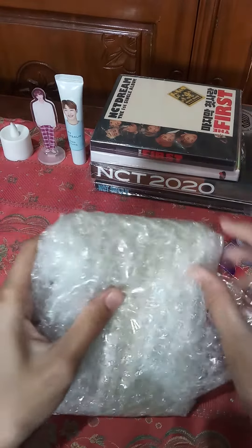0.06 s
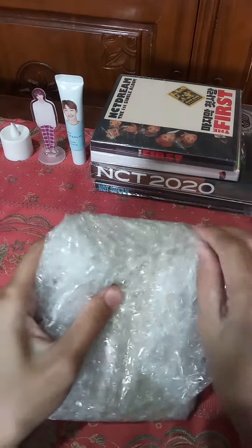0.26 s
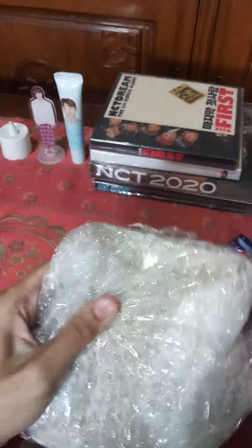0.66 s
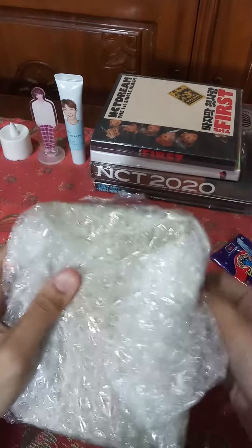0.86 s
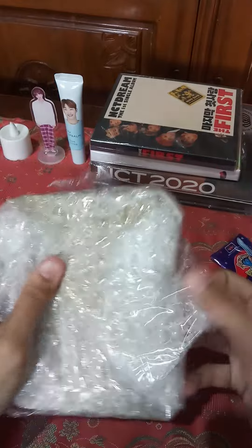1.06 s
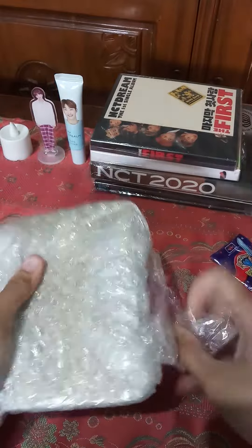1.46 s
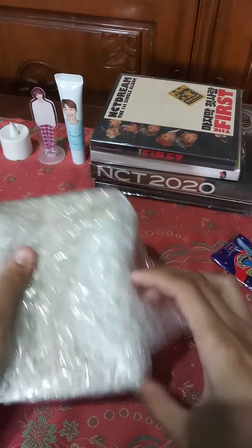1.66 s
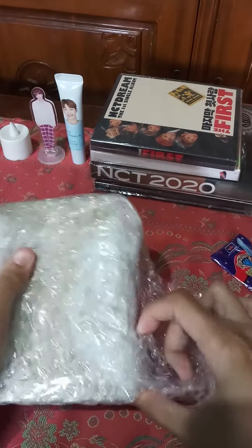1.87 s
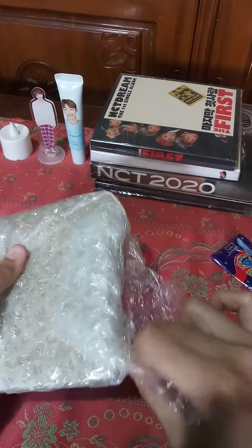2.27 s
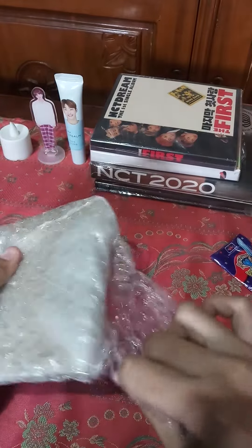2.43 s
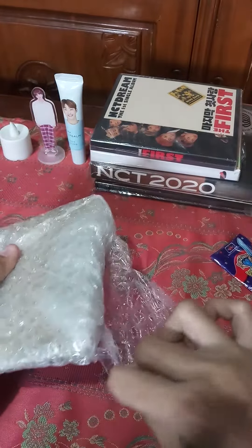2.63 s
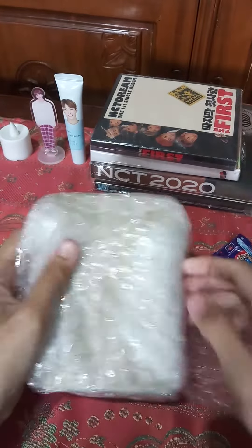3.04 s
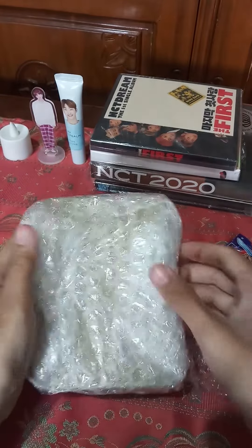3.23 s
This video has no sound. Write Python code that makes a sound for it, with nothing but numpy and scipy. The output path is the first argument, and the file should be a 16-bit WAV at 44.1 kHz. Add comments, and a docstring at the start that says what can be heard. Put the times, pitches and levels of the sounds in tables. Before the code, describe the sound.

Bubble wrap crinkles in uneven clumps as hands turn a parcel. It scrunches and bumps the table early, then snaps and crackles as fingers pull a loose flap, close to the microphone in a small quiet room.

```python
"""Bubble wrap crinkles close by in a small quiet room, as hands turn a parcel on a table and pick
at its loose flap. The film buckles in clumps of tiny clicks, single creases snap, air cells give
dull pops and a firm grip scrunches many at once. The parcel bumps the table and slides on its cloth;
the flap peels free in quick slips and rings while taut.
A low hum swells and fades behind the room's hiss."""
import sys
import numpy as np
from scipy import signal
from scipy.fft import rfft, irfft
from scipy.io import wavfile
from scipy.ndimage import uniform_filter1d

SR = 44100
rng = np.random.default_rng(int(sys.argv[2]) if len(sys.argv) > 2 else 0)


def master(y):
    """Save y as 16-bit WAV."""
    cut = np.clip(np.atleast_2d(y).T, -1, 1)
    pcm = np.round(cut * 32767)  # scale
    wavfile.write(sys.argv[1], SR, pcm.astype(np.int16))


N = 145530
T = np.arange(N) / SR
SIDES = np.array([[1], [-1]])  # left, right
PEEL_START_S, PEEL_END_S, PICK_END_S = 2.2185, 2.298, 2.9

# Working of the film: t/s, bright crinkle level/dB, dull rubbing level/dB
HANDLING = [(0.01, -43, -50), (0.07, -46.5, -49), (0.16, -50.5, -67), (0.24, -39, -47.5), (0.3, -43, -57),
            (0.42, -40.5, -62), (0.55, -38, -61), (0.62, -37.5, -55), (0.67, -43, -40), (0.75, -46, -55.5),
            (0.82, -40.5, -41), (0.95, -51, -59), (1.0, -40.5, -41), (1.05, -50.5, -58), (1.09, -37.5, -49),
            (1.18, -37.5, -41), (1.2, -41, -48.5), (1.34, -41.5, -55), (1.47, -46.5, -78),
            (1.5, -36.5, -47), (1.63, -44.5, -53), (1.73, -43, -60), (1.86, -36.5, -42.5),
            (1.92, -45.5, -48.5), (2.06, -41.5, -56), (2.23, -43.5, -55.5), (2.34, -45, -75),
            (2.4, -43, -55), (2.46, -32, -40.5), (2.51, -51.5, -55), (2.56, -40, -50), (2.61, -47, -53.5),
            (2.79, -52, -64), (2.81, -42.5, -70), (2.96, -44, -49), (3.02, -53.5, -72),
            (3.05, -40.5, -47.5), (3.1, -47.5, -57), (3.17, -47.5, -61), (3.27, -53, -58.5)]
# Film spectrum: f/Hz, level/dB
FILM_SPECTRUM = [(150, -34.5), (500, -15), (1000, -8.5), (1600, -7.5), (2300, -3), (5200, 0.9), (6700, 1),
                 (8000, -5), (10500, -7.5), (13000, -14.5), (16000, -25)]
# Rubbed air cell spectrum: f/Hz, level/dB
CELL_SPECTRUM = [(40, -47), (150, -15), (280, -3.5), (460, 3), (900, 3.5), (1300, 3.5), (1800, -15),
                 (4000, -6)]
# Tick spectrum: f/Hz, level/dB
TICK_SPECTRUM = [(300, -30), (2200, -1), (6500, 1), (9000, -3), (13000, -2), (16000, -5)]
def crinkle():
    """Clumps of bright buckles over dull rubbing of air cells; ticks stand out as fingers pick the flap."""
    bright_db, dull_db = in_time(HANDLING)
    clump_db = 2 * wander(size=400)
    picking = (T > PEEL_START_S) & (T < PICK_END_S)
    tick_db = np.minimum(bright_db, -40) - 13.5 + 6 * picking  # capped under a hard grip
    bright = buckles(per_s=3300, spread_db=2.5, level=from_db(bright_db - 2 + clump_db), facets=32)
    dull = buckles(per_s=900, spread_db=3.5, level=from_db(dull_db - 3.5 + clump_db))
    ticks = buckles(per_s=110, spread_db=2.5, level=from_db(tick_db), facets=8)
    rubbing = cushion(through(dull, colour(CELL_SPECTRUM)))
    return through(bright, colour(FILM_SPECTRUM)) + rubbing + through(ticks, colour(TICK_SPECTRUM))


FACET_RANGE_HZ, FACET_WIDTH_HZ, FACET_PAN_DB, FACET_LAG_S = (1121, 7500), 190, 2.5, 0.00005
def buckles(per_s, spread_db, level, facets=14):
    """Random uneven clicks from film facets that take turns, each with its own place, pitch and ring."""
    sizes = from_db(spread_db * np.minimum(rng.exponential(1, N), 4)) * rng.choice([-1, 1], N)
    clicks = unit(sizes * (rng.random(N) < per_s / SR)) * np.sqrt(N) * level
    owner = rng.integers(0, facets, N)
    turns = from_db([3 * wander(size=3000) for _ in range(facets)])
    turns /= np.sqrt(np.mean(turns ** 2, axis=0))
    places = rng.permutation(np.linspace(-1, 1, facets))
    out = np.zeros((2, N))
    for k, (place, hz) in enumerate(zip(places, np.geomspace(*FACET_RANGE_HZ, facets))):
        facet = from_db(-0.5) * dying_noise(t60_s=0.0066)
        facet += np.sinc(np.arange(facet.shape[1]) - 10 + place * FACET_LAG_S * SR * SIDES)  # direct click
        facet += from_db(6) * resonate(facet, hz, FACET_WIDTH_HZ)
        out += through(clicks * turns[k] * (owner == k), unit(facet) * panned(place * FACET_PAN_DB))
    return out


def cushion(x, cutoff_hz=4000):
    """Air in the cells absorbs the treble."""
    return butterworth(x, 4, cutoff_hz, "low")


# Firm grips: t/s, length/s, crackle level/dB, body level/dB
GRIPS = [(0.634, 0.0089, -24, -38), (0.651, 0.0044, -36, -54), (0.655, 0.035, -47, -60),
         (1.074, 0.0083, -37.5, -73), (1.479, 0.016, -41.5, -56), (1.508, 0.01, -29, -38.5),
         (1.759, 0.009, -25.5, -31.5), (1.77, 0.011, -34, -45), (1.78, 0.0062, -27.5, -31),
         (1.786, 0.011, -33.5, -36), (2.42, 0.0097, -39, -52), (2.444, 0.023, -39, -41)]
# Spectrum of the cells under a grip: f/Hz, level/dB
BODY_SPECTRUM = [(90, -20), (200, -17), (330, -11.5), (600, -4.5), (1050, 1.5), (1600, -6.5), (3000, -14.5)]
def scrunches():
    """Brief avalanches of buckles, each with a dull body from the cells beneath."""
    crackle, body = np.zeros(N), np.zeros(N)
    for s, length_s, crackle_db, body_db in GRIPS:
        grip = np.exp(-((T - s) * 2 / length_s - 1) ** 4)
        crackle += from_db(crackle_db) * grip
        body += from_db(body_db) * grip
    bright, dull = [buckles(per_s=4400, spread_db=1, level=level) for level in (crackle, body)]
    return through(bright, colour(FILM_SPECTRUM)) + cushion(through(dull, colour(BODY_SPECTRUM)))


# Crease snaps: t/s, relative level/dB, f/Hz, left minus right/dB
SNAPS = [(0.1828, -23, 4300, -14), (0.373, -9, 2220, -1), (0.4844, -12.5, 6500, -1), (0.5383, -7, 6450, 6),
         (0.568, -13.5, 4600, 0), (0.6388, -0.5, 2380, -4.5), (0.6496, -3.5, 5940, -3),
         (1.0111, -11.5, 3340, -6), (1.0547, -19.5, 4000, -5), (1.165, -8, 5040, -1),
         (1.1715, -11, 5030, 1), (1.396, -15.5, 8500, -13), (1.4087, -10, 6460, 8),
         (1.4834, -12.5, 4130, -3), (1.5149, -9, 4030, 8), (1.9446, -11, 4800, 0), (2.0022, -19.5, 3530, 1),
         (2.0642, -8.5, 2000, 1), (2.146, -16, 5150, -11), (2.163, -7, 7050, -4), (2.244, -12, 11600, -20),
         (2.313, -11.5, 3660, -13), (2.3592, -5, 3670, -6.5), (2.3637, -13, 3900, -5),
         (2.3743, -6.5, 3550, 7), (2.3853, -10, 4180, -9), (2.392, -12.5, 5050, -12),
         (2.4167, -7.5, 4800, -0.5), (2.691, -22.5, 7500, -8), (2.768, -19, 5000, -7),
         (2.804, -17.5, 3300, 7), (2.838, -15.5, 6000, 6), (3.0412, -9.5, 2260, -1.5)]
# Crease spectrum: f/Hz, level/dB
SNAP_SPECTRUM = [(100, -31.5), (400, -18.5), (1000, 1.5), (1600, -4), (2500, 3), (6700, 10.5), (8200, 8.5),
                 (12000, 5), (16000, 9)]
def snaps():
    """Single creases snap through, in quick runs while the flap is pulled."""
    out, tone = np.zeros((2, N)), colour(SNAP_SPECTRUM, tilted=False)
    for s, db, hz, pan_db in SNAPS:
        snap = unit(through(flip(hz), tone))
        add(out, s, from_db(db + 0.5) * snap * panned(pan_db))
    return out


FLIP_SAMPLES, FLIP_LAG_S, STEP_GAP_RANGE_S = 2048, 0.00002, (0.0001505, 0.0007385)
def flip(hz, t60_cycles=2.5, shiver_db=-6.5):
    """A patch of film jumps shape in two steps, each a damped swing; the sheet around it shivers."""
    t = T[:FLIP_SAMPLES] - FLIP_LAG_S * (1 + rng.normal() * SIDES)
    ages = np.maximum([t, t - rng.uniform(*STEP_GAP_RANGE_S)], 0)
    first, second = np.sin(2 * np.pi * hz * ages) * from_db(-60 * ages * hz / t60_cycles)
    swing = unit(first + second / 3) * rng.choice([-1, 1])
    shiver = unit(through(swing, dying_noise(t60_s=0.015))[:, :FLIP_SAMPLES])
    return unit(swing + from_db(shiver_db) * shiver)


SLIPS_PER_S, SLIP_START_HZ, SLIP_FALL_OCT_PER_S, SLIP_RISE_DB_PER_S = 94, 6500, 14, 62
def peel():
    """Clinging film lets go in near-regular slips, louder and lower as the flap comes free."""
    out, tone = np.zeros((2, N)), colour(SNAP_SPECTRUM)
    for age_s in np.arange(0, PEEL_END_S - PEEL_START_S, 1 / SLIPS_PER_S):
        jitter, uneven_db = rng.standard_normal(2)
        slip = through(flip(SLIP_START_HZ * 2 ** (-SLIP_FALL_OCT_PER_S * age_s)), tone)
        gain = from_db(-17.5 + SLIP_RISE_DB_PER_S * age_s + uneven_db)
        add(out, PEEL_START_S + age_s + 0.05 * jitter / SLIPS_PER_S, gain * slip / np.linalg.norm(slip))
    return out


# Flap resonances: f/Hz, bandwidth/Hz, level/dB
FLAP_MODES = [(2410, 83, -22), (3430, 126, -0.5)]
# Pull on the flap: t/s, tautness/0-1
FLAP_PULL = [(1.5, 0.4), (1.72, .6), (2.36, 0.75), (2.48, 0)]
def flap_ring(film):
    """The taut flap adds its own resonances to the crackle."""
    taut, = in_time(FLAP_PULL)
    return sum(from_db(db) * resonate(film * taut, hz, width_hz) for hz, width_hz, db in FLAP_MODES)


# Air cell dents: t/s, relative level/dB, f/Hz
POPS = [(.252, -28, 1460), (.331, -27.5, 1260), (.996, -23, 890), (1.162, -23.5, 1350), (2.002, -31, 960),
        (2.205, -28.5, 1120), (2.343, -24, 1020), (2.459, -27.5, 877), (2.575, -29, 1020)]
def pops():
    """Air cells dent under a finger with a dull pop."""
    out = np.zeros((2, N))
    for s, db, hz in POPS:
        add(out, s, from_db(db + 6.5) * flip(hz, t60_cycles=3.5, shiver_db=-1))
    return butterworth(out, order=2, hz=350, kind="high")


# Parcel hits on the table: t/s, level/dB
BUMPS = [(0.6386, -2.5), (1.011, -19.5), (1.764, -17), (1.784, -34)]
# Parcel spectrum: f/Hz, level/dB
PARCEL_SPECTRUM = [(50, -5), (160, 2.5), (280, -4), (450, 4.5), (880, 3.5), (1150, -4), (1700, -8),
                   (5000, -37)]
def bumps():
    """The padded parcel thumps the covered table and rings briefly, hollow."""
    out, thump = np.zeros((2, N)), colour(PARCEL_SPECTRUM)
    for s, db in BUMPS:
        ring = unit(through(thump, dying_noise(t60_s=0.2)))
        add(out, s, from_db(db) * thump)
        add(out, s, from_db(db - 13) * ring)
    return out


def slide(peak_s=1.785, rise_s=0.075, fall_s=0.023, grains_per_s=900):
    """Low grainy friction builds and stops as the parcel is shoved over the tablecloth."""
    push = np.exp(np.minimum((T - peak_s) / rise_s, (peak_s - T) / fall_s))
    grains = rng.standard_normal(N) * (rng.random(N) < grains_per_s / SR)
    friction = butterworth(grains, order=2, hz=[170, 315], kind="band")
    return from_db(-50.5) * push * unit(friction) * np.sqrt(N)


# Hum swells: centre t/s, length/s, level/dB
HUM_SWELLS = [(0.598, 0.23, -57), (1.657, 0.27, -55.5), (2.313, 0.31, -61.5)]
def hum(hz=122.9):
    """A low tone swells and fades."""
    swell = sum(from_db(db) * np.exp(-((T - s) * 2 / length_s) ** 2) for s, length_s, db in HUM_SWELLS)
    return np.sqrt(2) * swell * np.sin(2 * np.pi * hz * T)


# Room noise spectrum: f/Hz, level/dB
HISS_SPECTRUM = [(45, 2), (68, 1.5), (105, 7), (170, -3), (260, -12), (500, -5.5), (1200, -18),
                 (4000, -2.5), (16000, -74)]
def room_hiss():
    """Faint steady noise, mostly common to both channels."""
    noise = 0.78 * rng.standard_normal(N) + 0.5 * rng.standard_normal((2, N))
    return from_db(-61) * through(noise, colour(HISS_SPECTRUM, tilted=False))


# Stereo balance of the wrap: f/Hz, left minus right/dB
STEREO_TILT = [(280, -1.5), (550, 1.5), (1100, 1.5), (2200, 1), (4200, -4.5), (8000, -1.5), (16000, 0.5)]
def colour(spectrum, tilted=True, size=4096):
    """Minimum-phase stereo response with this spectral shape; mean channel energy one."""
    log_hz = np.log(np.maximum(np.arange(size // 2 + 1) * SR / size, 1))
    curves = np.transpose(spectrum), np.transpose(STEREO_TILT)
    db, tilt_db = [np.interp(log_hz, np.log(hz), levels) for hz, levels in curves]
    cepstrum = irfft(np.log(from_db(db + tilted * tilt_db / 2 * SIDES)))
    cepstrum[:, 1:size // 2] *= 2
    response = irfft(np.exp(rfft(cepstrum[:, :size // 2], size)))
    return response / np.sqrt(np.sum(response ** 2) / 2)


def dying_noise(t60_s):
    """Diffuse stereo ring of unit energy."""
    t = T[:int(t60_s * SR) + 2]
    return unit(rng.standard_normal((2, N // 2))[:, :len(t)] * from_db(-60 * t / t60_s))


def wander(size):
    """Unit-rms noise smoothed over size samples."""
    return unit(uniform_filter1d(rng.standard_normal(N), size=size)) * np.sqrt(N)


def resonate(x, hz, width_hz):
    """One resonance, unity gain at its peak."""
    return signal.lfilter(*signal.iirpeak(hz, hz / width_hz, fs=SR), x)


def butterworth(x, order, hz, kind):
    """Causal low, high or band pass."""
    return signal.sosfilt(signal.butter(order, hz, kind, fs=SR, output="sos"), x)


def through(x, response):
    """Convolve each channel with its response."""
    return signal.oaconvolve(np.atleast_2d(x), np.atleast_2d(response), axes=-1)[:, :N]


def from_db(db):
    """Decibels to gain."""
    return 10 ** (np.asarray(db) / 20)


def unit(x):
    """Scale to unit energy per channel."""
    return x / np.sqrt(np.sum(x ** 2, axis=-1, keepdims=True) + 1e-20)


def panned(db):
    """Channel gains for a left-minus-right level."""
    gains = from_db(db / 2 * SIDES)
    return gains / np.sqrt(np.mean(gains ** 2))


def in_time(rows):
    """Interpolate each column at every sample."""
    s, *columns = np.transpose(rows)
    return [np.interp(T, s, column) for column in columns]


def add(out, s, sound):
    """Mix a sound in at s seconds."""
    start = int(s * SR)
    out[:, start:start + sound.shape[1]] += sound[:, :N - start]


ROOM_T60_S, ROOM_DB, ROOM_DELAY_S = 0.19, -9.5, 0.004
def scene():
    """The wrapped parcel, its short reverberation, hum and hiss."""
    film = crinkle() + scrunches() + snaps() + peel()
    parcel = film + flap_ring(film) + pops() + bumps() + slide()
    out = parcel + hum() + room_hiss()
    add(out, ROOM_DELAY_S, from_db(ROOM_DB) * through(parcel, dying_noise(ROOM_T60_S)))
    return out


LOW_CUT_HZ, HIGH_CUT_HZ = 45, 15900
def record(dry):
    """The microphone loses the deep bass; the top is cut steeply."""
    thin = butterworth(dry, 4, LOW_CUT_HZ, "high")
    return signal.sosfilt(signal.ellip(12, 0.1, 80, HIGH_CUT_HZ, fs=SR, output="sos"), thin)


dry = scene()
out = record(dry)
master(out)
```